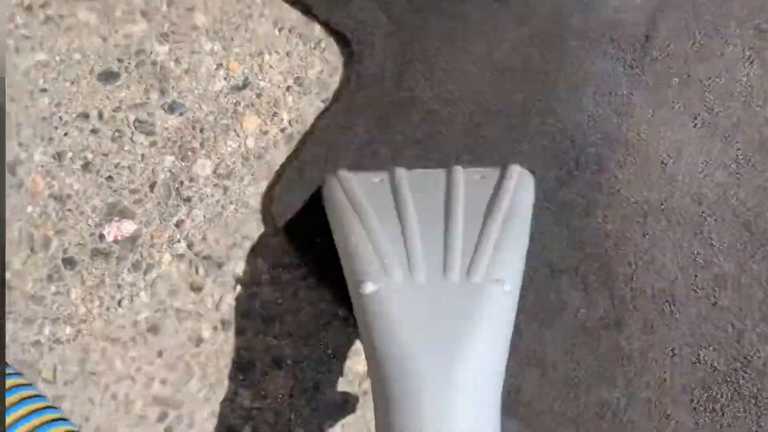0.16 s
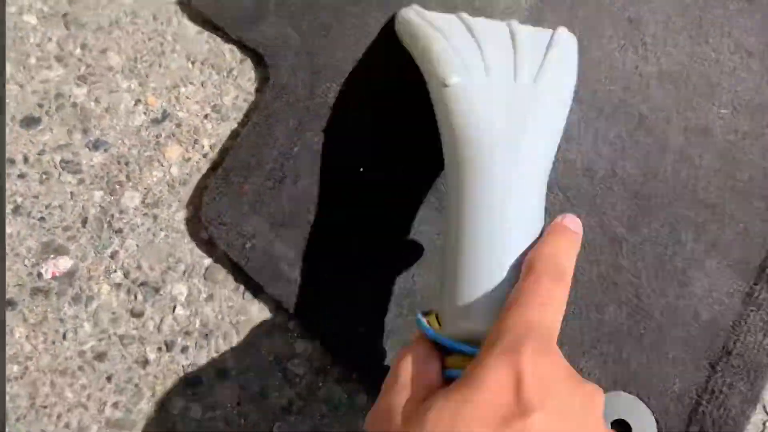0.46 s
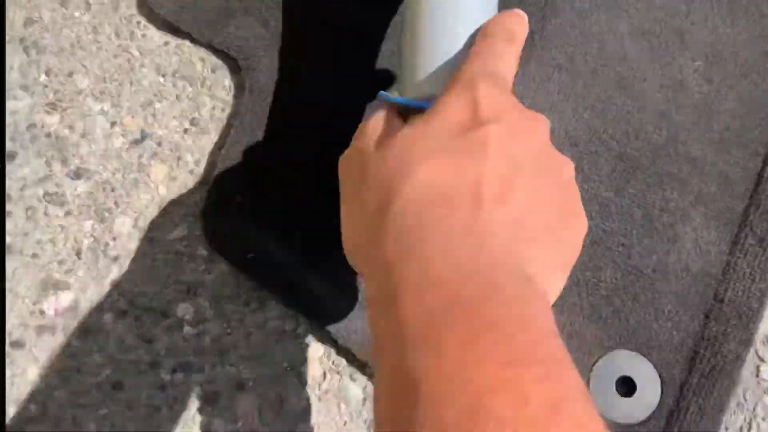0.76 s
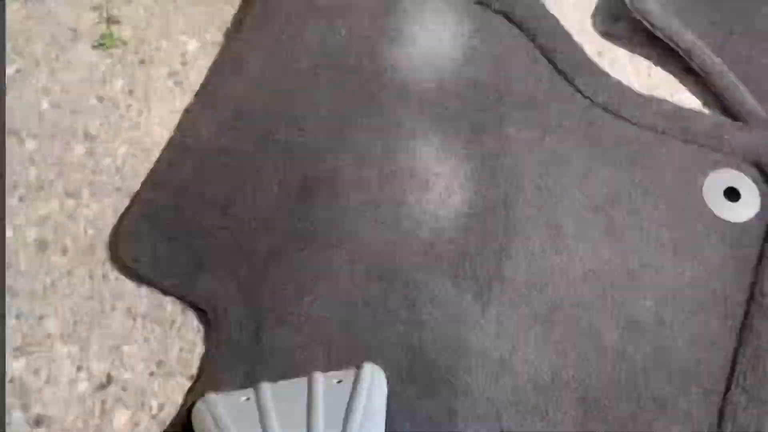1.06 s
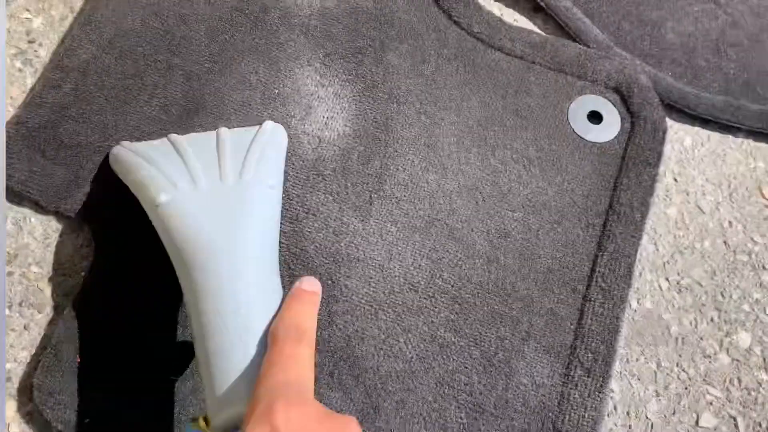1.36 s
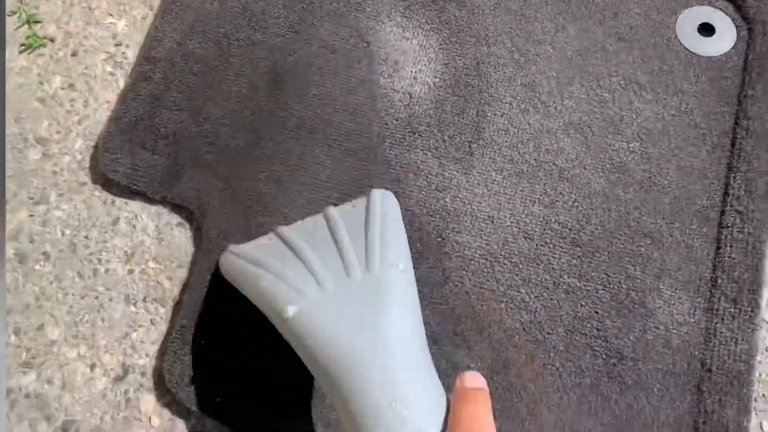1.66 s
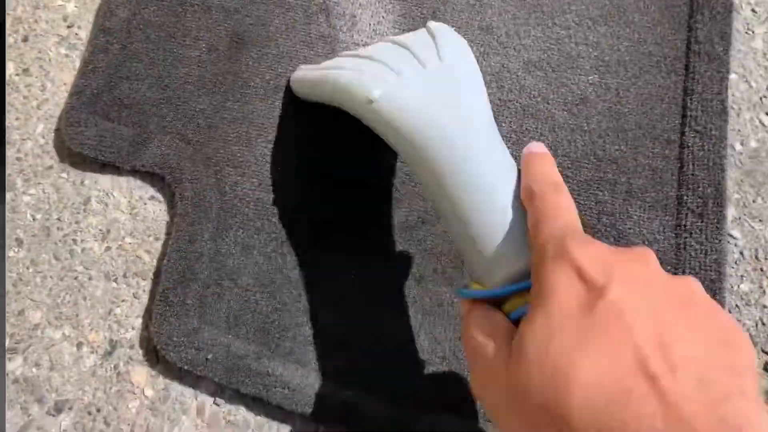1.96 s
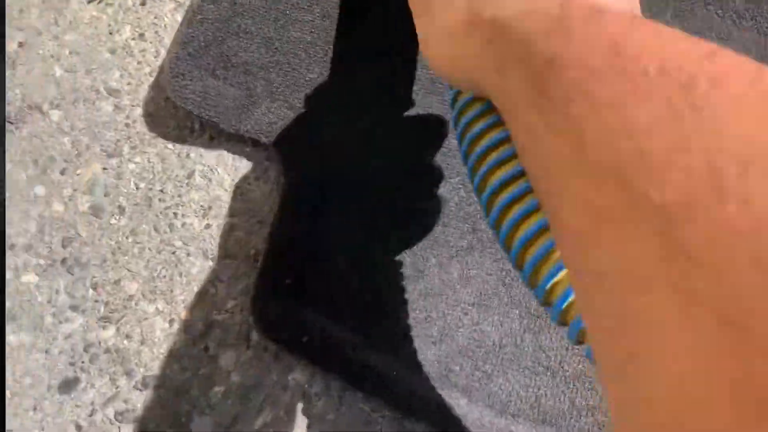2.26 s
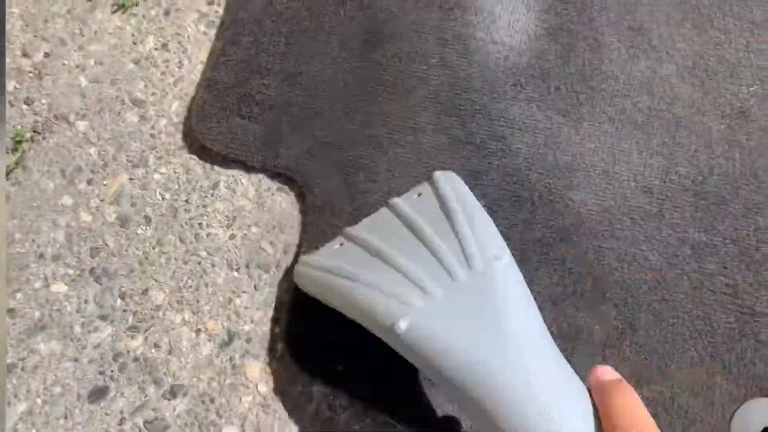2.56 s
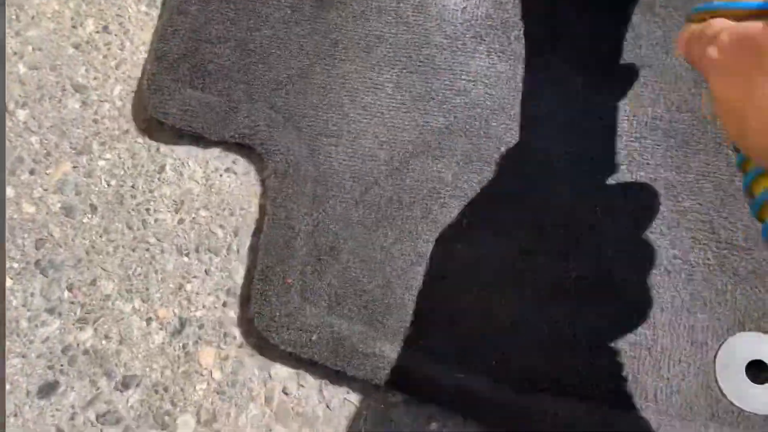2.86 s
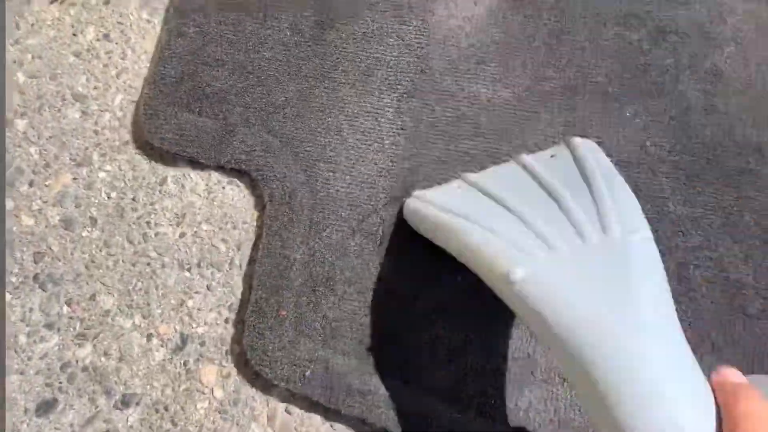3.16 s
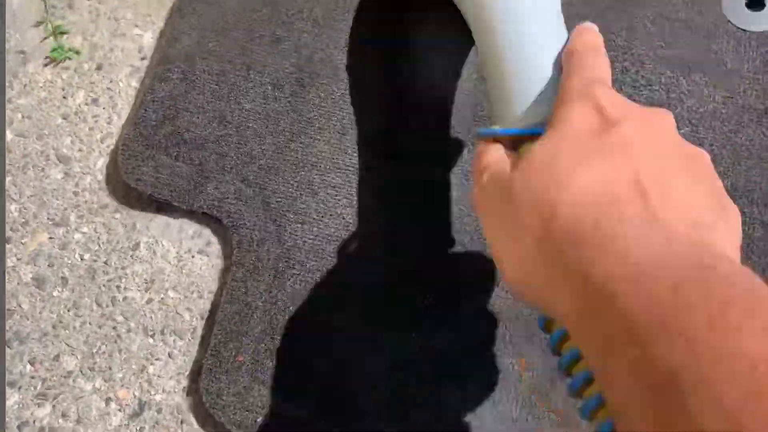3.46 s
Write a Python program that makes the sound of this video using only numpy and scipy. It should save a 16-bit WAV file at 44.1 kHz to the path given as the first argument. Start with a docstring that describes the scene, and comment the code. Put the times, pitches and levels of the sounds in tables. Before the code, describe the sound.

A vacuum cleaner runs close by throughout, a steady rush and hiss of air over a low pulsing hum. Its nozzle drags across a carpet mat, making the suction tone swell and fade. A soft puff of air bumps the microphone around 0.7 seconds. Short fluttering howls come between 1 and 2 seconds, the tone dips near 2.2, a brief whistle follows at 2.5, and another howl around 3.

```python
"""A car wash vacuum runs outdoors while its plastic nozzle is dragged over a carpet mat.
Its two motors turn at slightly different speeds, so their hums beat. Turbulent air hisses in at the
mouth and excites resonances of nozzle and hose, which swell, fade and howl as the mouth is pressed
and tilted. Nearby surfaces reflect the rush of air, and one soft puff thuds on the microphones."""
import sys
import numpy as np
from scipy import signal
from scipy.fft import rfft, irfft, next_fast_len
from scipy.io import wavfile
from scipy.ndimage import uniform_filter1d, map_coordinates

SR = 44100
rng = np.random.default_rng(int(sys.argv[2]) if len(sys.argv) > 2 else 0)


def generate_wav(sig):
    """Save sig (samples, or channels by samples) to the path in sys.argv[1] as 16-bit PCM at SR."""
    pcm = np.round(np.clip(np.atleast_2d(sig).T, -1, 1) * 32767).astype(np.int16)
    wavfile.write(sys.argv[1], SR, pcm)


N = 158760
TIME = np.arange(N) / SR

SLOW_SHAFT_HZ, FAST_SHAFT_HZ = 280.04, 295.68
FLUTTER_PER_S, FLUTTER_DB, FLUTTER_HZ = 28, 2, 14  # the pile shakes the air at the mouth

# Harmonics of each motor and of the faster one's fan: shaft order, level/dB, left minus right/dB
SLOW_HARMONICS = [(1, -35, 8.5), (2, -56, 10), (11, -49, 3)]
FAST_HARMONICS = [(1, -33.5, 14), (2, -51, -14), (6, -52.5, 27)]
FAN_HARMONICS = [(12, -55.5, 0), (15, -55, 0), (18, -52, 0), (24, -52, 0), (36, -61.5, 0)]
# Swell of the motors' fundamentals: t/s, gain/dB
HUM_GAIN = [(0.0, -4), (0.55, -1), (0.75, -1), (0.9, 0.7), (1.35, 1.6), (1.8, -0.8), (2.35, 0.6),
            (2.7, -1.2), (3.3, -1), (3.59, 1.5)]
# Phase by which the left microphone leads the right: f/Hz, phase/rad
PHASE_LEAD = [(0, 0), (1200, 0), (2400, 1.4), (3600, 1.75), (4800, 3.14), (9000, 9.42), (13150, 15.7),
              (16000, 19.6)]
# Likeness of the noise at the two microphones: f/Hz, coherence
COHERENCE = [(40, .96), (90, .8), (250, .55), (600, .25), (950, .2), (1200, .5), (3000, .52), (4000, .72),
             (4700, .95), (9000, .93), (15000, .92)]
# Spectra of the rush, hiss and rumble: f/Hz, base density level/dB (in a 1 Hz band)
AIR_DENSITY = [(100, -106), (300, -65), (510, -73), (700, -66.5), (900, -64), (1040, -67.5), (1300, -64),
               (1900, -62), (2400, -62.5), (3000, -64), (3800, -62.3), (4400, -69), (5300, -70),
               (7000, -80), (10000, -100)]
HISS_DENSITY = [(1500, -110), (4000, -70.5), (5400, -67.5), (7200, -68.2), (8200, -70), (9200, -75),
                (10100, -72.8), (10700, -75.3), (12200, -76.3), (13500, -80), (15800, -80)]
RUMBLE_DENSITY = [(10, -100), (25, -86), (33, -74), (43, -61.5), (60, -62.5), (95, -64), (150, -70),
                  (200, -67.5), (270, -78.5), (450, -75), (1500, -120)]
# Swell of the rush and of the hiss: t/s, relative level/dB
AIR_GAIN = [(0.0, 0), (0.25, 1), (0.45, -1.6), (0.65, 0), (1.0, -0.2), (1.25, 0), (1.5, -2), (2.05, 0.8),
            (2.45, -0.7), (3.0, 0.7), (3.59, -0.7)]
HISS_GAIN = [(0.0, 0), (0.2, .5), (0.5, -.6), (0.8, -.6), (1.2, 1), (1.5, -1.1), (2.0, 0), (2.35, 1.6),
             (2.6, .3), (3.2, -.4), (3.6, -.2)]
# Reflections from the pavement and nearby surfaces: delay/s, gain/dB
REFLECTIONS = [(.0025, -14), (.0042, -13), (.0085, -10)]
# Swell of the nozzle's three resonances and of its upper whistle: t/s, relative level/dB
LOW_MODE_GAIN = [(0.0, -3), (0.68, -3), (0.76, 5), (1.1, 3), (1.2, 7), (1.38, 7.5), (1.48, 2), (1.6, 5),
                 (2.03, 6), (2.08, -12), (2.4, -3), (3.05, -10), (3.59, -7)]
MID_MODE_GAIN = [(0.0, 7), (0.25, 5.5), (0.7, 2), (1.2, -0.5), (1.3, -3), (1.55, 5), (1.95, 0.5), (2.1, 0),
                 (2.2, -14), (2.33, 3.5), (2.9, 4.5), (3.3, 4.5), (3.59, 1.5)]
HIGH_MODE_GAIN = [(0.0, -1), (0.2, 3), (0.45, -2), (0.9, -2.5), (1.6, 3.5), (2.1, 0), (2.2, -12),
                  (2.3, 3.5), (2.4, 3), (2.55, -2), (2.7, 3), (3.0, 5), (3.45, 4.5), (3.59, 2)]
WHISTLE_GAIN = [(0.0, -42), (0.55, -36), (0.7, -34.5), (0.92, -34.5), (1.08, -46), (1.25, -36.5),
                (1.5, -37.5), (1.77, -29), (1.97, -48), (2.06, -27), (2.16, -46), (2.32, -33), (2.41, -41),
                (2.54, -21.5), (2.63, -47), (3.15, -41), (3.4, -27), (3.6, -50)]
# Sliding resonances of the flattened mouth: start/s, length/s, f/Hz, glide/(Hz/s), width/Hz, level/dB
HOWLS = [(.0, .26, 1520, -60, 130, -38.5), (.96, .17, 1580, 300, 100, -33), (.95, .08, 1975, 700, 100, -35),
         (1.18, .13, 2035, -250, 100, -37.5), (1.2, .2, 1138, -180, 70, -37.5),
         (1.39, .19, 1285, 550, 80, -34.5), (1.72, .19, 1735, 100, 90, -36),
         (2.05, .07, 1720, 1400, 110, -37.5), (2.5, .21, 920, -650, 80, -41),
         (2.96, .32, 1385, -80, 80, -33), (2.94, .36, 1500, -100, 110, -38.5)]
# Resonances of hose and canister: f/Hz, width/Hz, base level/dB, left minus right/dB
HOSE_MODES = [(406, 82, -39.5, 3), (625, 95, -47, 1), (820, 115, -43.3, 4), (1000, 70, -53, 0)]
# Swell of the hose's drone: t/s, gain/dB
DRONE_GAIN = [(0.0, 0), (0.4, 2), (0.7, 4), (0.9, 1), (2.1, 0), (2.3, 2.7), (2.45, 1), (2.65, 1.5),
              (2.95, 1), (3.59, 1)]
# Contour of the rumble, whose swing about the mean is scaled into a gain: t/s, unscaled level/dB
RUMBLE_CONTOUR = [(0.0, -48), (0.45, -46.5), (1.0, -46.5), (2.7, -47.5), (2.8, -47), (2.95, -47),
                  (3.59, -47)]


def amp(db):
    """Amplitude ratio of a level in decibels."""
    return 10 ** (np.asarray(db) / 20)


def unit(x):
    """Normalisation to rms 1."""
    return x / np.sqrt(np.mean(x ** 2) + 1e-20)


def along(points, hz):
    """Interpolation of (f/Hz, value) rows on a logarithmic frequency axis."""
    f, values = np.transpose(points)
    return np.interp(np.log(hz + 1), np.log(f + 1), values)


def curve(rows):
    """Linear interpolation of (t/s, value) rows at every sample."""
    return np.interp(TIME, *np.transpose(rows))


def wobble(per_s):
    """Smooth random modulation: a spline through per_s Gaussian values a second."""
    knots = rng.standard_normal(int(N * per_s / SR) + 4)
    return map_coordinates(knots, [TIME * per_s])


def filtered(x, response):
    """Linear filtering: the spectrum of x times a complex frequency response."""
    size = next_fast_len(N + SR // 4)
    hz = np.fft.rfftfreq(size, 1 / SR)
    return irfft(rfft(x, size) * response(hz), size)[..., :N]


def pan(left_db):
    """A level difference, split into gains for the two channels."""
    return amp(np.array([[left_db], [-left_db]]) / 2)


def lead(hz):
    """A phase difference, split between the two microphones."""
    return np.array([[.5], [-.5]]) * np.interp(hz, *np.transpose(PHASE_LEAD))


def motor(shaft_hz, harmonics):
    """A rotor radiates harmonics of its shaft frequency: a hum with wavering overtones."""
    in_phase_s = .018  # a moment when the two motors' hums add up
    drift_hz, waver_db, waver_rad = .045, 2.2, .6
    turns = shaft_hz * (TIME - in_phase_s) + np.cumsum(drift_hz * wobble(4.3)) / SR
    out = np.zeros((2, N))
    for order, db, left_db in harmonics:
        phase = 2 * np.pi * order * turns + lead(np.array([order * shaft_hz]))
        if order == 1:
            gain_db = curve(HUM_GAIN)
        else:
            gain_db = waver_db * wobble(6.23)
            phase += waver_rad * (wobble(10) + np.array([wobble(4.84), wobble(5.13)]))
        out += np.sqrt(2) * amp(db + gain_db) * pan(left_db) * np.cos(phase)
    return out


def turbulence(patchy_db):
    """Turbulence gives white noise, patchy in time and frequency and partly coherent at two points."""
    def mid_side_gains(hz):
        angle = np.arccos(np.clip(along(COHERENCE, hz), -.99, .99)) / 2
        return np.array([np.cos(angle), np.sin(angle)])

    spectra = signal.stft(rng.standard_normal((2, N)), nperseg=1024)[2]
    patches = uniform_filter1d(rng.standard_normal(spectra.shape[1:]), size=6, axis=0)
    patches = uniform_filter1d(patches, size=12, axis=1)
    noise = signal.istft(spectra * amp(patchy_db * unit(patches)), nperseg=1024)[1][:, :N]
    mid, side = filtered(noise, mid_side_gains)
    pair = np.array([mid + side, mid - side])
    return unit(filtered(pair, lambda hz: np.exp(1j * lead(hz))))


def rush(density, patchy_db):
    """Broadband flow noise: turbulence shaped to a spectral density."""
    return filtered(turbulence(patchy_db), lambda hz: amp(along(density, hz)) * np.sqrt(SR / 2))


def suction():
    """Turbulent inflow rushes at the mouth and hisses in the pile; dragging modulates its amplitude."""
    flutter = wobble(22.63)
    air = amp(curve(AIR_GAIN) + .2 * flutter) * rush(AIR_DENSITY, patchy_db=2.1)
    swell_db = curve(HISS_GAIN)
    hiss_db = swell_db - swell_db.mean() + .45 * flutter + .35 * wobble(76)
    return air + amp(hiss_db) * rush(HISS_DENSITY, patchy_db=1.8)


def echoed(x):
    """Comb filtering: direct sound interferes with reflections whose paths vary as the nozzle moves."""
    sway = .025  # relative change of path length
    out = x
    for delay_s, db in REFLECTIONS:
        read_at = np.arange(N) - delay_s * SR * (1 + sway * wobble(2))
        out = out + amp(db) * np.array([map_coordinates(channel, [read_at]) for channel in x])
    power_gain = 1 + sum(amp(db) ** 2 for _, db in REFLECTIONS)
    return out / np.sqrt(power_gain)


def resonance(centre_hz, width_hz):
    """Resonance driven by turbulence: three band-pass stages, each width_hz wide, scaled to rms 1."""
    def stage(hz):
        return 1j * hz * width_hz / (centre_hz ** 2 - hz ** 2 + 1j * hz * width_hz)

    return unit(filtered(turbulence(patchy_db=1.5), lambda hz: stage(hz) ** 3))


def nozzle():
    """Three air resonances and two whistles swell and fade as the mat opens and closes the mouth."""
    scrub_db, scrub_per_s = 2.2, 24  # the pile makes each resonance flutter
    low_db, mid_db, high_db = (curve(rows) + scrub_db * wobble(scrub_per_s)
                               for rows in (LOW_MODE_GAIN, MID_MODE_GAIN, HIGH_MODE_GAIN))
    low = amp(low_db - 47) * resonance(centre_hz=1130, width_hz=90)
    lower_whistle = whistle(order=4, level_db=curve(LOW_MODE_GAIN) - 46.3, left_db=0)
    mid = amp(mid_db - 39) * echoed(resonance(centre_hz=1360, width_hz=310))
    high = amp(high_db - 37) * echoed(resonance(centre_hz=1712, width_hz=330))
    upper_whistle = whistle(order=6, level_db=curve(WHISTLE_GAIN) - 6, left_db=-4)
    return low + mid + high + lower_whistle + upper_whistle


def whistle(order, level_db, left_db):
    """Selective resonance: the nozzle picks out a harmonic of the slower motor as a rough warble."""
    warble_rad = .5 * (wobble(45) + .6 * np.array([wobble(5), wobble(5)]))
    phase = 2 * np.pi * order * SLOW_SHAFT_HZ * TIME + warble_rad
    envelope = amp(level_db + FLUTTER_DB * wobble(2 * FLUTTER_PER_S))
    return np.sqrt(2) * envelope * pan(left_db) * np.cos(phase)


def howl():
    """Pressed flat, the mouth resonates at a frequency that slides with tilt and flutters on the pile."""
    attack_s, release_s = .04, .06
    out = np.zeros((2, N))
    for start_s, length_s, hz, glide_hz_per_s, width_hz, db in HOWLS:
        t = TIME - start_s
        gate = np.clip(1 + t / attack_s, 0, 1) * np.clip(1 - (t - length_s) / release_s, 0, 1)
        shift_hz = glide_hz_per_s * np.clip(t, 0, length_s) + FLUTTER_HZ * wobble(FLUTTER_PER_S)
        analytic = signal.hilbert(resonance(hz, width_hz))  # rotating its phase shifts the whole band
        sliding = np.real(analytic * np.exp(2j * np.pi * np.cumsum(shift_hz) / SR))
        out += gate * amp(db + FLUTTER_DB * wobble(FLUTTER_PER_S)) * sliding
    return out


def hose():
    """Flow excites the modes of hose and canister, over a rumble of handling and moving air."""
    drone = sum(amp(db) * pan(left_db) * resonance(hz, width_hz)
                for hz, width_hz, db, left_db in HOSE_MODES)
    contour = curve(RUMBLE_CONTOUR)
    rumble_db = 1.16 * (contour - contour.mean())
    rumble = amp(rumble_db) * rush(RUMBLE_DENSITY, patchy_db=2.16)
    return amp(curve(DRONE_GAIN)) * drone + rumble


def widened(x):
    """Decorrelation: the low sound spreads briefly as the channels' sum falls and difference rises."""
    centre_s, half_length_s, cutoff_hz = .635, .115, 1200
    mid_db, side_db = -9, 4
    swell = np.exp(-((TIME - centre_s) / half_length_s) ** 4)
    left, right = filtered(x, lambda hz: 1 / (1 + (hz / cutoff_hz) ** 20))
    mid_change = (amp(mid_db * swell) - 1) * (left + right) / 2
    side_change = (amp(side_db * swell) - 1) * (left - right) / 2
    return x + np.array([mid_change + side_change, mid_change - side_change])


def puff():
    """A puff of air makes a soft thud: low pressure fluctuations, independent at each microphone."""
    centre_s, half_length_s, level_db = .655, .07, -39
    centre_hz, spread_hz = 92, 40
    noise = rng.standard_normal((2, N))
    thud = unit(filtered(noise, lambda hz: np.exp(-((hz - centre_hz) / spread_hz) ** 2 / 2)))
    envelope = np.exp(-((TIME - centre_s) / half_length_s) ** 2)
    return amp(level_db) * envelope * thud


def scene():
    """Superposition: two hums beat at their difference frequency amid the sounds of the airflow."""
    slow_motor = motor(SLOW_SHAFT_HZ, SLOW_HARMONICS)
    fast_motor = motor(FAST_SHAFT_HZ, FAST_HARMONICS + FAN_HARMONICS)
    airflow = echoed(suction()) + nozzle() + howl() + hose() + puff()
    return slow_motor + fast_motor + widened(airflow)


def record(dry):
    """Band limiting: an ideal low-pass filter removes the highest treble."""
    cutoff_hz = 15820
    return filtered(dry, lambda hz: hz < cutoff_hz)


dry = scene()
out = record(dry)
generate_wav(out)
```